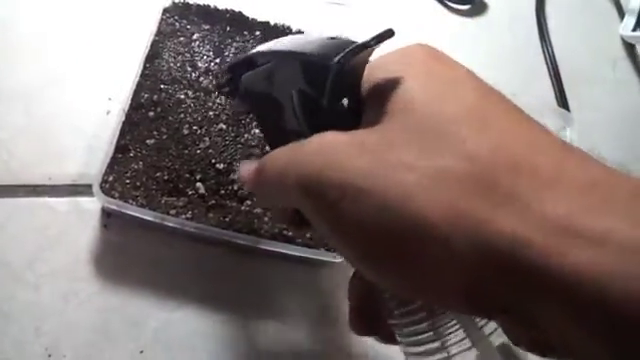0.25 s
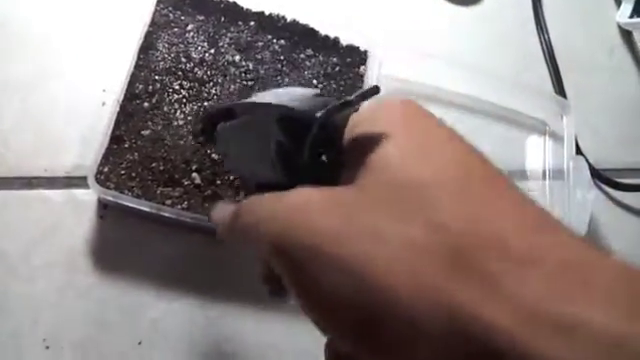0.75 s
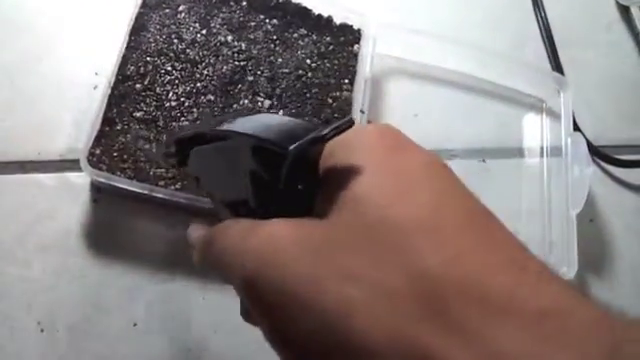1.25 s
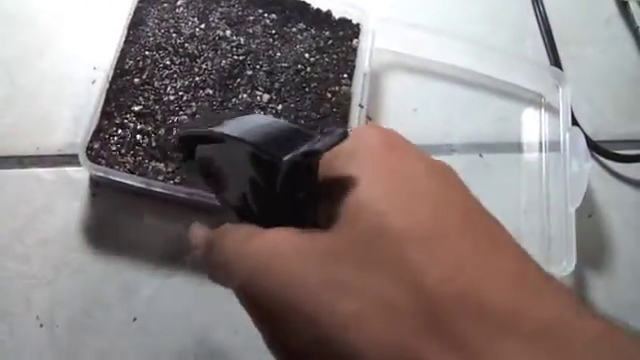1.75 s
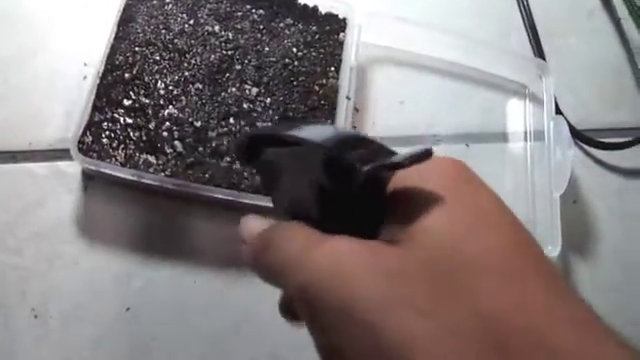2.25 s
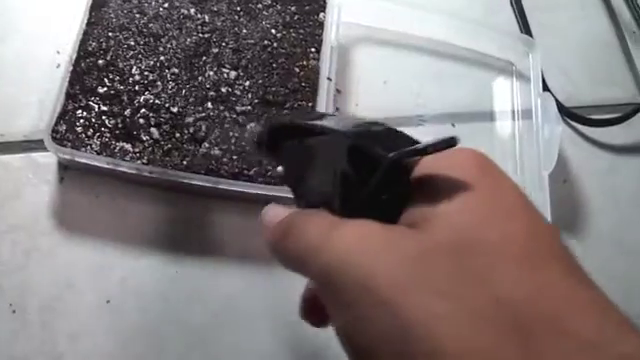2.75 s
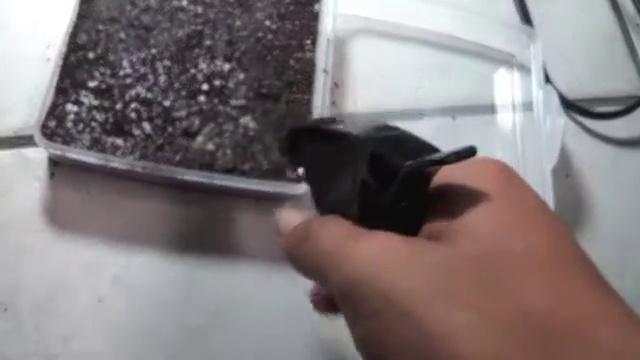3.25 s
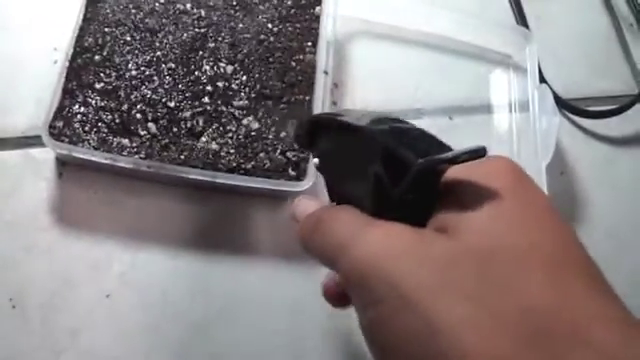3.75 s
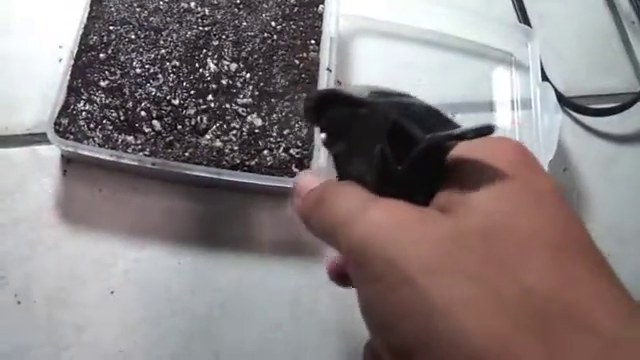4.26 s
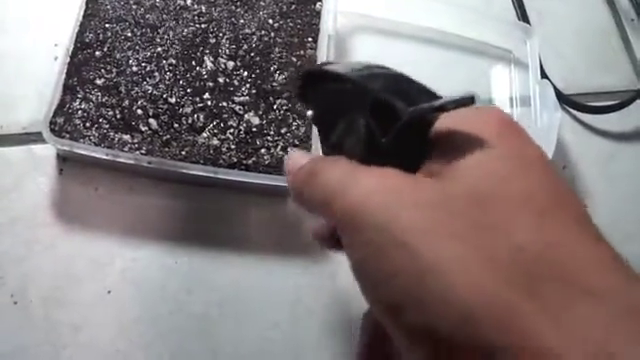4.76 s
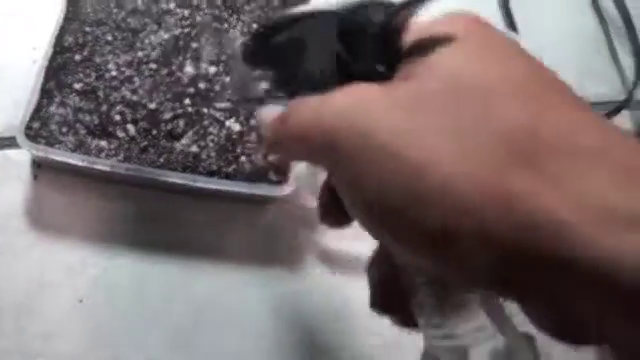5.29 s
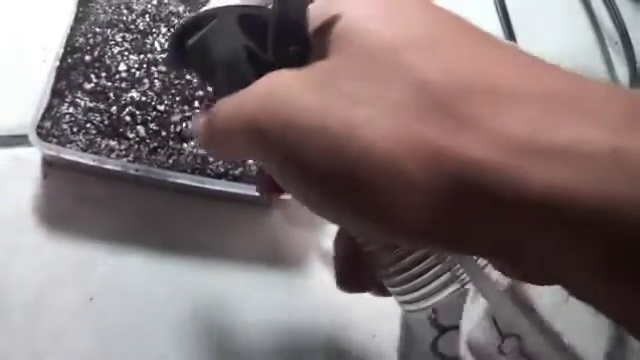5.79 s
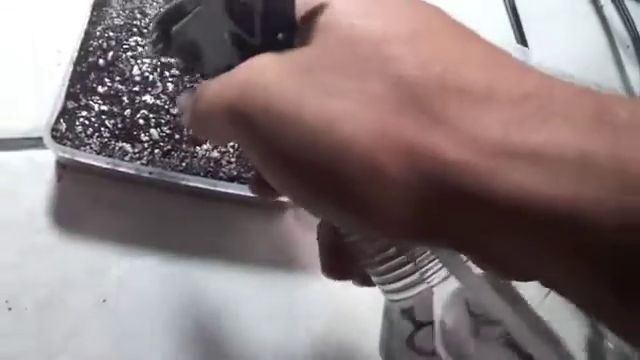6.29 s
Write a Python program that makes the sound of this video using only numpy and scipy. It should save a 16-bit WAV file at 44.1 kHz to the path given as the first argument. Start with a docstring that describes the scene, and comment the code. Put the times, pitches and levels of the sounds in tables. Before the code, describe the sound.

Close up in a small room, a plastic trigger spray bottle is pumped steadily about three times a second. Each squeeze gives a stuttering plastic click with a hollow bottle knock, then a short bright hiss of mist; the release ticks, creaks and sucks faintly. The hisses grow a little stronger and the pace eases slightly. Low steady room noise lies beneath, the top end dull.

```python
"""In a small room, a plastic trigger sprayer is pumped about three times a second over a tray of damp soil.
Each squeeze starts with stick-slip of the piston, whose impulses ring the modes of spray head and bottle.
Then the nozzle hisses: filtered noise that follows the pump pressure, with droplets pattering in it.
On release the spring ticks, the piston creaks and the pump sucks in water through a narrow resonance.
Soft bumps touch the bottle, something far away hoots faintly, and steady noise fills the room."""
import sys
import numpy as np
from scipy import signal
from scipy.fft import rfft, irfft
from scipy.io import wavfile

SR = 44100
rng = np.random.default_rng(int(sys.argv[2]) if len(sys.argv) > 2 else 0)


def int16_out(signal):
    """Quantize to a 16-bit WAV file."""
    q = np.round(np.clip(np.atleast_2d(signal).T, -1, 1) * 32767)
    wavfile.write(sys.argv[1], SR, q.astype(np.int16))


N = 287973
TIME = np.arange(N) / SR

# resonances of the spray head: f/Hz, bandwidth/Hz, relative level/dB
HEAD_MODES = [(2146, 170, -8.5), (2650, 190, -3), (2995, 390, 0.5), (3345, 260, 1.5), (3712, 110, 1.5),
              (4280, 580, -3.5), (4780, 400, -2.5), (5240, 570, -0.5), (5390, 190, 1.5), (5740, 240, -4),
              (6410, 390, -8), (7000, 130, -11.5)]
# resonances of the bottle and the water in it: f/Hz, bandwidth/Hz, relative level/dB
BOTTLE_MODES = [(214.4, 90, -7.5), (330, 113, -3), (475, 140, -16.5), (829, 59, -4), (999, 50, -6.5),
                (1203, 65, -6), (1660, 60, -12), (1966, 110, -12.5), (2274, 84, -10)]
# pulls of the trigger: start t/s, number of piston slips, gap after the first slip t/s,
#   head level at the first slip/dB, at the second/dB, change per further slip/dB, bottle level/dB,
#   squeeze time until fullest flow t/s, hiss level/dB, return stroke level/dB
# (each source adds its own offset to these levels)
TRIGGER_PULLS = [(-.08, 1, .007, -17, -22, 2, -40, 0.082, -32, -56.5),
                 (0.2089, 4, 0.0076, -18, -23.5, -5, -28, 0.087, -32.5, -53.5),
                 (0.4997, 3, 0.007, -17.5, -26, 3.5, -31, 0.085, -31, -56.5),
                 (0.7672, 1, .007, -23, -22, -5, -39.5, 0.092, -31.5, -55.5),
                 (1.0715, 5, 0.0097, -21.5, -19.5, 1.2, -29, 0.086, -33.5, -50),
                 (1.3548, 4, .0098, -27, -18, -8.5, -28.5, .083, -31.5, -53.5),
                 (1.6144, 3, 0.014, -24, -23, -4.5, -38, 0.11, -30, -57),
                 (1.914, 3, 0.011, -27.5, -28.5, -7, -41.5, 0.11, -28.5, -54),
                 (2.238, 1, .007, -27, -26, 0, -38, 0.093, -28.5, -54.5),
                 (2.531, 3, 0.0082, -28.5, -29.5, -10, -41.5, 0.1, -29.7, -53.5),
                 (2.8531, 2, 0.0056, -25.5, -25, 0, -34, 0.1, -29, -48.5),
                 (3.1881, 3, 0.0066, -25, -19.5, -6, -33, 0.1, -28.2, -54.5),
                 (3.5435, 7, 0.011, -19, -15, -1.4, -27.5, 0.11, -30.5, -51),
                 (3.8923, 3, .008, -27.5, -16.5, -11, -30, .101, -28.5, -52),
                 (4.216, 3, .006, -24.5, -23, -2, -30, .102, -28, -53.5),
                 (4.562, 2, 0.0067, -17.5, -24, 0, -32.5, 0.11, -27.5, -53),
                 (4.9414, 2, 0.0045, -27, -27, 0, -36.5, 0.11, -26.5, -53),
                 (5.3209, 6, 0.0092, -18.5, -17.5, -1.2, -28.5, 0.12, -27, -55.5),
                 (5.697, 3, 0.0076, -17, -21.5, -1, -28, 0.11, -27, -54),
                 (6.0704, 4, .01, -22.5, -16, -4.5, -29, 0.12, -27.7, -46.5),
                 (6.448, 9, .0128, -18, -20, -.2, -26, 0.12, -21.5, -55)]


def from_db(db):
    """Level to amplitude ratio: 20 dB per factor of ten."""
    return 10 ** (np.asarray(db) / 20)


def rms(x):
    """Root mean square, kept above zero."""
    return np.sqrt(np.mean(x ** 2) + 1e-20)


def add(track, s, sound):
    """Superposition: mix a sound into the track at time s, as far as it falls inside."""
    at = round(s * SR) + np.arange(len(sound))
    inside = (at >= 0) & (at < N)
    track[at[inside]] += sound[inside]


def colour(x, spectrum):
    """Minimum-phase filtering by the folded cepstrum; unit energy, so white noise keeps its level."""
    size = 4096
    hz, db = np.transpose(spectrum)
    bins_hz = np.fft.rfftfreq(size, 1 / SR)
    gain = from_db(np.interp(np.log(bins_hz + 1), np.log(hz), db))
    cepstrum = irfft(np.log(gain))
    # fold the anticausal half onto the causal one
    cepstrum[1:size // 2] *= 2
    cepstrum[size // 2 + 1:] = 0
    response = irfft(np.exp(rfft(cepstrum)))
    response /= np.linalg.norm(response)
    return signal.fftconvolve(x, response)[:len(x)]


def resonate(x, modes):
    """Modal synthesis: parallel two-pole resonators with alternating signs."""
    out = 0
    for k, (hz, width_hz, db) in enumerate(modes):
        r = np.exp(-np.pi * width_hz / SR)   # pole radius
        poles = [1, -2 * r * np.cos(2 * np.pi * hz / SR), r * r]
        zeros = np.array([1, 0, -1]) * (1 - r * r) / 2
        out = out + (-1) ** k * from_db(db) * signal.lfilter(zeros, poles, x + 1e-18)
    return out


def knock(modes, chatter_s, chatter_db, vary_db):
    """Impulsive excitation: a snap and a decaying chatter ring randomly varied modes; rms 1 at the start."""
    t = TIME[:SR // 10]
    force = from_db(chatter_db) * rng.standard_normal(len(t)) * np.exp(-t / chatter_s)
    force[0] += rng.choice([-1, 1])
    varied = [(hz, width, db + vary_db * rng.standard_normal()) for hz, width, db in modes]
    sound = resonate(force, varied)
    sound *= 1 - np.exp(-t / .0002)   # soft plastic takes a moment to give way
    return sound / rms(sound[t < .004])


def grains(per_s, spread_db):
    """Shot noise: sparse random clicks of uneven size and either sign; rms 1."""
    excess_db = spread_db * np.minimum(rng.exponential(1, N), 4)
    sizes = from_db(excess_db) * rng.choice([-1, 1], N)
    clicks = sizes * (rng.random(N) < per_s / SR)
    return clicks / rms(clicks)


def slip_delays(slips, first_gap_s):
    """Stick-slip under growing load: seconds from the squeeze to each slip, the gaps shrinking to a floor."""
    gap_shrink, shortest_gap_s = .77, .004
    gaps = np.maximum(first_gap_s * gap_shrink ** np.arange(round(slips) - 1), shortest_gap_s)
    return np.append(0, np.cumsum(gaps))


def returns():
    """Spring recoil: the trigger returns a fixed number of squeeze times after each start: (middle s, dB)."""
    return_squeezes = 2.6
    return [(start + return_squeezes * squeeze_s, db) for start, *_, squeeze_s, _, db in TRIGGER_PULLS]


def room_noise(level_db):
    """Stationary coloured noise: the steady background of the room."""
    # background spectrum: f/Hz, relative level per Hz/dB
    spectrum = [(30, -32.5), (75, -37), (125, 1), (170, -7), (300, -2), (500, -4.5), (950, -1.5),
                (1500, -4), (3000, -6), (7000, -11)]
    return from_db(level_db) * colour(rng.standard_normal(N), spectrum)


def far_hoots(waver_s, tail_s):
    """Frequency modulation: random pitch waver makes some of these soft, slowly dying tones hoarse."""
    # faint far hoots: start t/s, end t/s, f/Hz, level/dB, pitch waver as a share of f
    hoots = [(0.334, 0.42, 583, -54, 0.13), (1.268, 1.304, 667, -51, 0.071),
             (1.32, 1.327, 667, -39.5, 0.027), (1.382, 1.48, 666, -50, 0.039),
             (4.516, 4.762, 584, -60, .14)]
    out = np.zeros(N)
    for start, end, hz, db, waver in hoots:
        wander = np.interp(TIME / waver_s, np.arange(N), rng.standard_normal(N))
        phase = 2 * np.pi * np.cumsum(hz * (1 + waver * wander)) / SR
        onset = np.clip((TIME - start) / 0.0035, 0, 1)
        decay = np.exp(-np.clip((TIME - end) / tail_s, 0, 20))
        tone = np.sqrt(2) * (np.sin(phase) + np.sin(2 * phase) / 10)
        out += from_db(db) * onset * decay * tone
    return out


def room(x):
    """Reverberation: a diffuse exponential tail from nearby walls, and low modes that ring on."""
    # boom that lingers in the room after a knock: f/Hz, bandwidth/Hz, level/dB
    room_modes = [(168, 12, -11), (212, 12, -19), (243, 11, -19), (283, 14, -18), (325, 14, -14)]
    t60_s, tail_db = 0.46, -15.5
    t = TIME[:SR // 2]
    tail = rng.standard_normal(len(t)) * from_db(-60 * t / t60_s) * (t > .004)
    diffuse = signal.fftconvolve(x, tail / np.linalg.norm(tail))[:N]
    return from_db(tail_db) * diffuse + resonate(x, room_modes)


def bumps(contact_s):
    """Soft contact: a touch of the hand rings the bottle wall, but not its two deepest resonances."""
    # soft bumps of the hand on the bottle: t/s, level/dB
    touches = [(3.112, -47.5), (3.116, -44.5), (3.163, -52), (5.653, -43)]
    out = np.zeros(N)
    for s, db in touches:
        touch = knock(BOTTLE_MODES[2:], chatter_s=contact_s, chatter_db=-10, vary_db=1)
        add(out, s, from_db(db) * touch)
    return out


def refill(stroke_s, suck_db, creak_db, suck_s):
    """Friction and flow noise: the returning piston creaks in fine ticks, water sings in the inlet valve."""
    def strokes(length_s):
        """Gaussian envelope around the middle of each return stroke."""
        return sum(from_db(db) * np.exp(-np.minimum(((TIME - s) / length_s) ** 2, 20))
                   for s, db in returns())
    suck = resonate(rng.standard_normal(N), [(2350, 130, 0)])
    creak = resonate(grains(per_s=520, spread_db=3.5), HEAD_MODES)
    water = from_db(suck_db) * strokes(suck_s) * suck / rms(suck)
    return water + from_db(creak_db) * strokes(stroke_s) * creak / rms(creak)


def spring(level_db, rattle_db, spacing_s, jitter_s, uneven_db, count):
    """Light impacts ring only the spray head: some sharp ticks, and a short uneven ratchet on every return."""
    # sharpest ticks of the spring and trigger: t/s, level/dB before level_db is added
    sharp_ticks = [(1.287, -38.5), (1.3381, -30.5), (1.981, -29.5), (2.4784, -38.5), (2.92, -30),
                   (3.1054, -39), (3.162, -26.5), (3.452, -36.5), (3.8062, -37), (3.8653, -27),
                   (4.1993, -28), (4.477, -35), (4.5102, -36.5), (4.851, -31), (4.8656, -34.5),
                   (4.8883, -35.5), (5.2282, -38.5), (6.37, -42)]
    ratchet = []
    for s, db in returns():
        for k in range(count):
            tick_s = s + (k - (count - 1) / 2) * spacing_s + jitter_s * rng.standard_normal()
            ratchet.append((tick_s, db + rattle_db + uneven_db * rng.standard_normal()))
    out = np.zeros(N)
    for s, db in list(sharp_ticks) + ratchet:
        tick = knock(HEAD_MODES, chatter_s=0.0012, chatter_db=-16.5, vary_db=4.0)
        add(out, s, from_db(db + level_db) * tick)
    return out


def piston(head_db, bottle_db, rub_db, rub_s, load_s, load_db, load_hz):
    """Stick-slip: each slip rings head and bottle; the harder the bottle shakes, the more the seal rubs."""
    # spectrum of the rubbing seal: f/Hz, relative level per Hz/dB
    rub_spectrum = [(40, -9), (120, -14), (250, 3), (520, -11), (950, 3), (1500, -4.5), (2700, -8.5),
                    (4200, -3), (5600, -1), (7500, -1.5)]
    first_slip_bottle_db = -5.5   # the first slip shakes the bottle less
    out, rubbing = np.zeros(N), np.zeros(N)
    t = TIME[:SR // 10]
    for start, slips, first_gap_s, first_head, second_head, head_change, full_bottle, *_ in TRIGGER_PULLS:
        for k, delay in enumerate(slip_delays(slips, first_gap_s)):
            s = start + delay
            load = 1 - np.exp(-delay / load_s)
            head = second_head + (k - 1) * head_change if k else first_head
            bottle = full_bottle + (1 - load) * first_slip_bottle_db
            # as the pump takes up load, the slips favour the high resonances of both parts
            head_modes = [(hz, width, db + load * load_db * np.exp(-np.log2(hz / load_hz) ** 2 / 0.14))
                          for hz, width, db in HEAD_MODES]
            bottle_modes = [(hz, width, db + load * 2.1 * np.log2(min(hz, 1000)))
                            for hz, width, db in BOTTLE_MODES]
            head_ring = knock(head_modes, chatter_s=0.0036, chatter_db=-20.0, vary_db=1.0)
            bottle_ring = knock(bottle_modes, chatter_s=.002, chatter_db=-27.5, vary_db=3.0)
            add(out, s, from_db(head + head_db) * head_ring)
            add(out, s, from_db(bottle + bottle_db) * bottle_ring)
            add(rubbing, s, from_db(bottle + rub_db) * np.exp(-t / rub_s))
    return out + colour(rubbing * rng.standard_normal(N), rub_spectrum)


def nozzle(level_db, decay_db, opening_s, drops_db, sputter_db, sputter_s, priming):
    """Jet noise: it opens as the stutter ends and follows the pump pressure; droplets patter on the soil."""
    # spectrum of the spray: f/Hz, relative level per Hz/dB
    mist_spectrum = [(60, -51), (130, -47.5), (230, -21), (400, -28), (650, -16.5), (930, -8.5),
                     (1200, -12.5), (2050, 0), (2800, -7), (3800, -6), (4600, -2), (5600, 2.5), (6400, 0),
                     (7600, -7)]
    rise_squeezes, fall_squeezes = 0.48, 0.76   # swell and fall of the hiss, in squeeze times
    usual_bottle_db = -33   # a pull that shakes the bottle this hard has the plain rise
    flow = np.zeros(N)
    for start, slips, first_gap_s, *_, bottle, squeeze_s, db, _ in TRIGGER_PULLS:
        opens = start + slip_delays(slips, first_gap_s)[-1]
        away = TIME - start - squeeze_s   # time from fullest flow
        # a hard pull has already built up pressure, so its swell is flatter; gentler ones rise faster
        rise = rise_squeezes * squeeze_s * from_db(priming * (bottle - usual_bottle_db))
        fall = fall_squeezes * squeeze_s
        # a quick round swell, then the pressure leaks away exponentially
        swell_db = np.where(away < 0, -10 * (away / rise) ** 2,
                            decay_db * (1 - np.sqrt(1 + (away / fall) ** 2)))
        opening = np.clip((TIME - opens) / opening_s, 0, 1)
        flow += from_db(db + np.maximum(swell_db, -120)) * opening
    # the jet is a little unsteady
    sputter = np.interp(TIME / sputter_s, np.arange(N), rng.standard_normal(N))
    jet = rng.standard_normal(N) + from_db(drops_db) * grains(per_s=2800, spread_db=1.5)
    return from_db(level_db + sputter_db * sputter) * flow * colour(jet, mist_spectrum)


def scene():
    """Superposition of the background, the sprayer close by and its room response."""
    background = room_noise(level_db=-57) + far_hoots(waver_s=0.003, tail_s=0.041)
    sprayer = bumps(contact_s=0.0018)
    sprayer += refill(stroke_s=0.028, suck_db=3.0, creak_db=0.5, suck_s=0.016)
    sprayer += spring(level_db=-2.0, rattle_db=10.0, spacing_s=0.014, jitter_s=.003, uneven_db=3, count=4)
    sprayer += piston(head_db=-2.0, bottle_db=-0.5, rub_db=8.0, rub_s=0.0069,
                      load_s=0.0071, load_db=10.5, load_hz=5400)
    sprayer += nozzle(level_db=2, decay_db=31, opening_s=0.0044, drops_db=-8.5,
                      sputter_db=1.25, sputter_s=0.0034, priming=0.32)
    return (sprayer + room(sprayer) + background)[None]


def record(dry):
    """Band limitation: a linear-phase low-pass filter rolls the top off steeply."""
    cutoff_hz = 6950
    low_pass = signal.firwin(63, cutoff_hz, window=("kaiser", 4), fs=SR)
    return signal.fftconvolve(dry, low_pass[None], mode="same")


dry = scene()
out = record(dry)
int16_out(out)
```